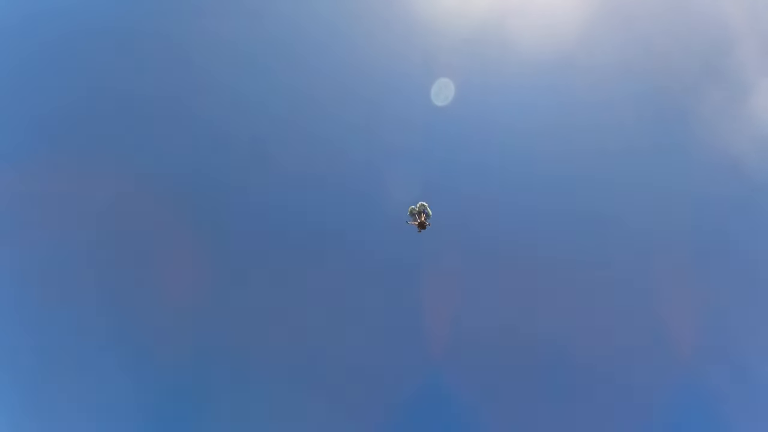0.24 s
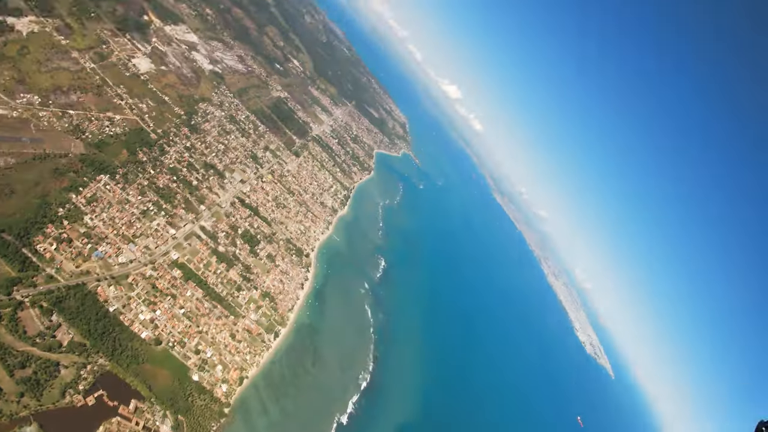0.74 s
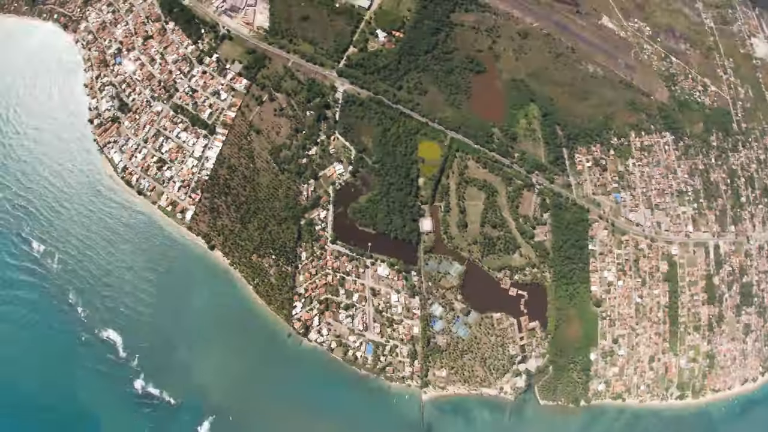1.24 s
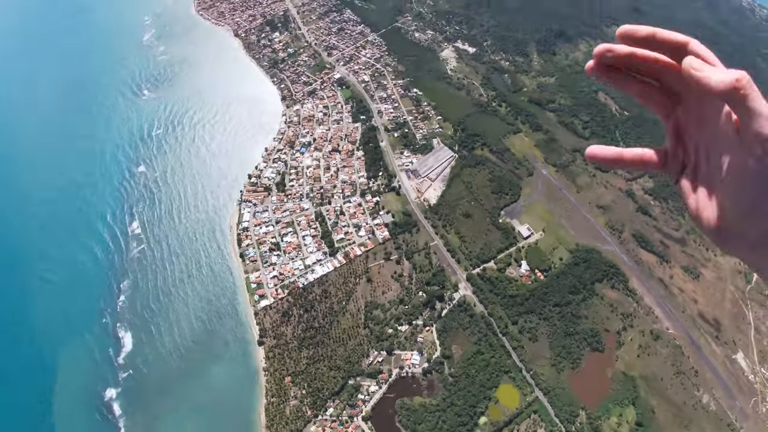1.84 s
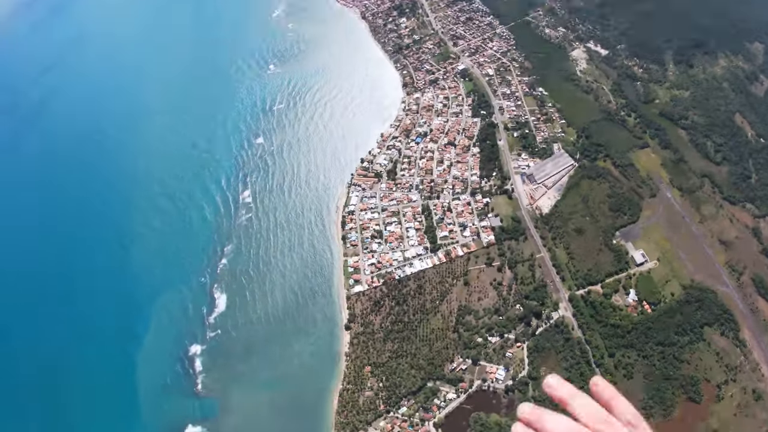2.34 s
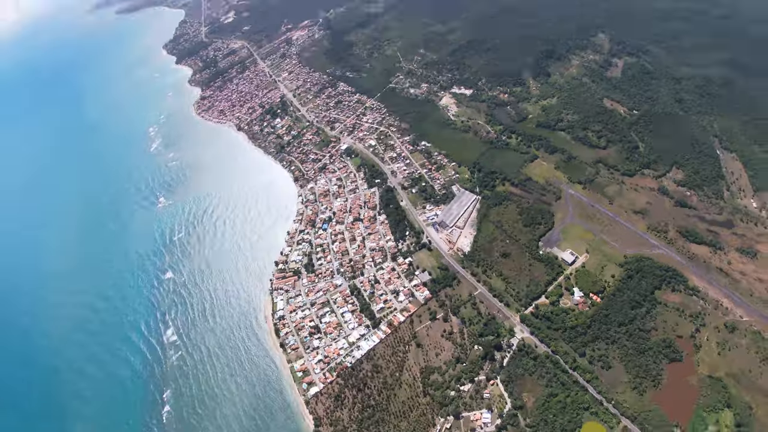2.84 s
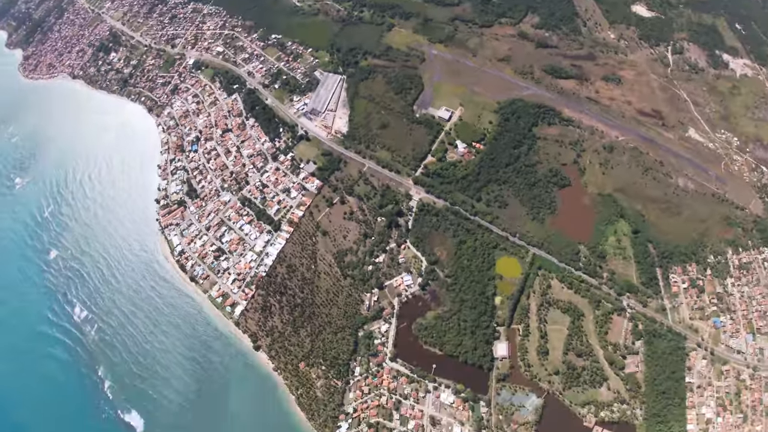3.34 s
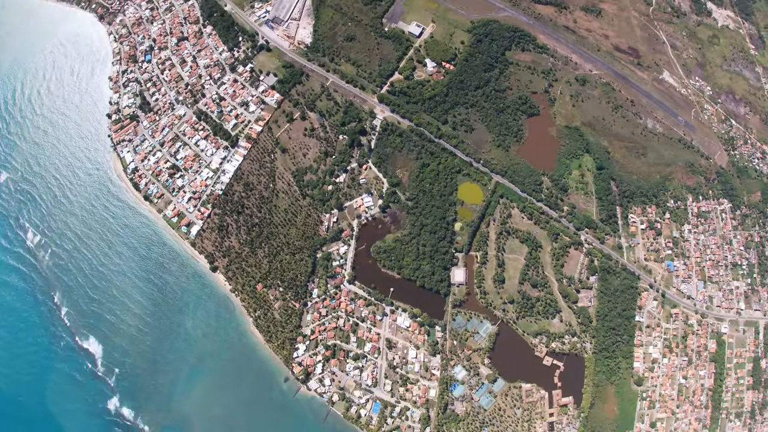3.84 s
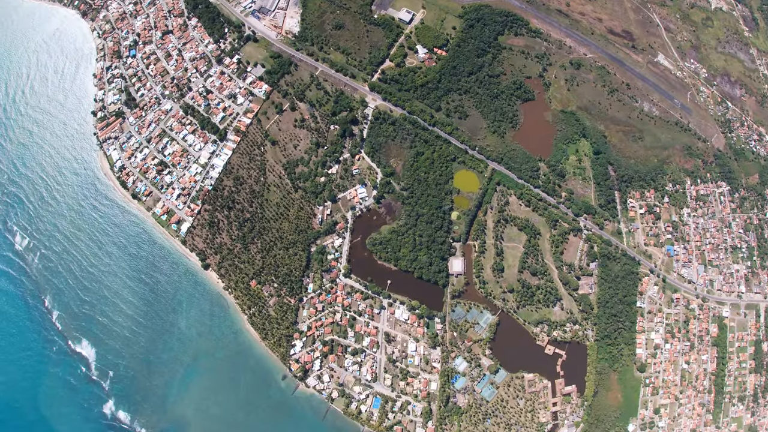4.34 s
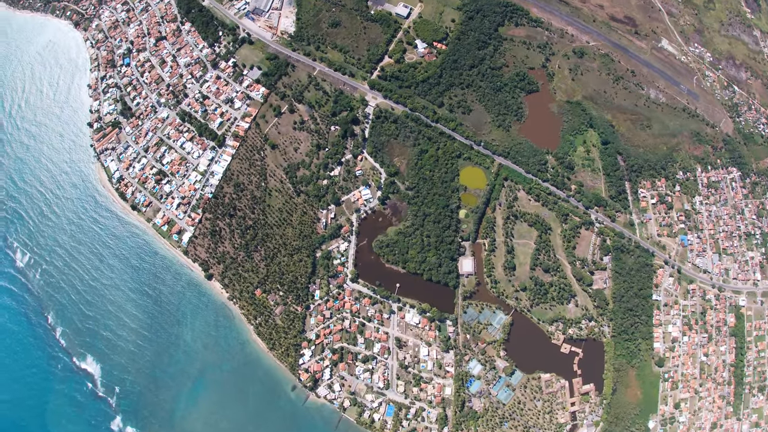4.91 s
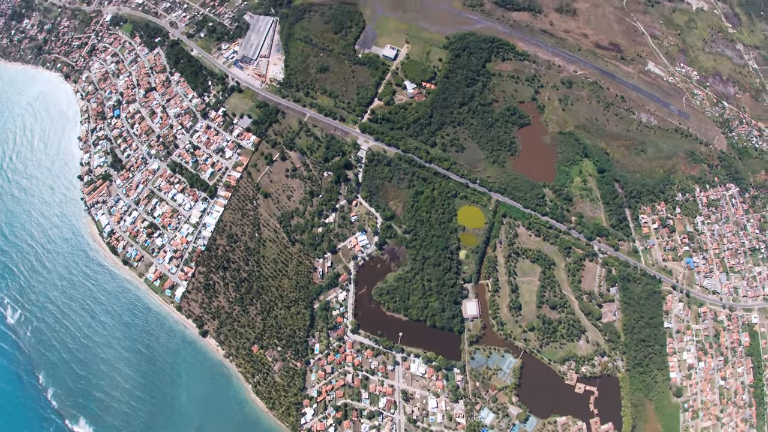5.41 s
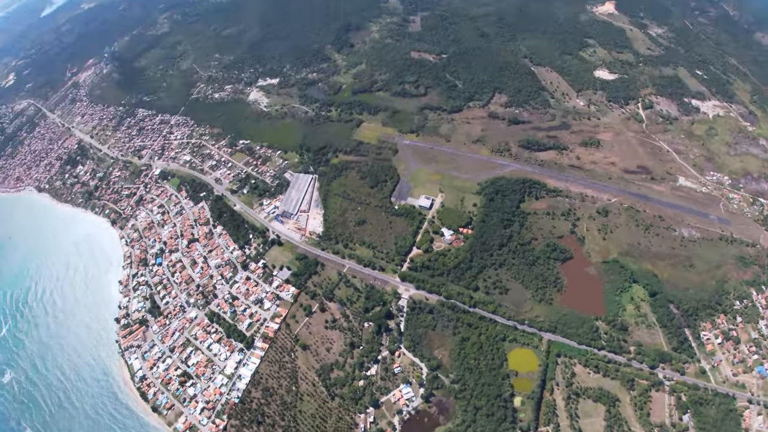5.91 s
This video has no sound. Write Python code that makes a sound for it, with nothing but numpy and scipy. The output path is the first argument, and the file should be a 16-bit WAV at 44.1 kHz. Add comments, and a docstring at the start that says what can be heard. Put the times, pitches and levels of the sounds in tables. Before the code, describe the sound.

High in open air, a skydiver's worn microphone is battered by wind. A rough, roaring rumble opens with crackling slaps and bright rushes, then drops to a weaker, fluttering throb with tiny whistles and puffs. It builds again to violent booms and slaps near three seconds, falls back suddenly, then swells into a steady, loud low roar with thickening hiss.

```python
"""Freefall wind on a worn camera

Air tears past a small camera worn by a skydiver who rolls over and settles belly down.
Rumble, vortex throb and resonant thuds buffet the microphone port under a torn, roaring wake.
Air skimming the housing is coloured noise that rushes, hisses and spits; edges add puffs and whistles.
Sharp slaps burst on the port. A limiter holds the peaks and a steep filter cuts the top."""
import sys
import numpy as np
from scipy import signal
from scipy.fft import rfft, irfft
from scipy.io import wavfile
from scipy.ndimage import uniform_filter1d, minimum_filter1d

SR = 44100
rng = np.random.default_rng(int(sys.argv[2]) if len(sys.argv) > 2 else 0)


def persist_wave(psi):
    """Save psi, clipped to +-1, as 16-bit WAV."""
    counts = np.round(np.clip(psi, -1, 1) * 32767).astype(np.int16)
    wavfile.write(sys.argv[1], SR, np.atleast_2d(counts).T)


N = 272097
TIME = np.arange(N) / SR

# Movement of the body and its flow
# how strongly air skims along the housing: (time [s], reference level [dB])
SKIM_LEVEL = [(0, -37.5), (0.188, -36.5), (0.205, -29), (0.255, -32), (0.277, -23.5), (0.38, -26),
              (0.45, -30), (0.58, -32), (0.63, -41), (0.73, -40), (0.81, -43), (0.87, -44), (1.2, -42.5),
              (1.29, -38.5), (1.38, -34), (1.595, -31.5), (1.635, -39.5), (1.77, -37), (1.92, -31.5),
              (2.3, -31.5), (2.37, -36), (2.5, -36), (2.66, -23), (2.74, -32.5), (2.96, -38.5), (2.99, -42),
              (3.35, -47), (3.47, -43), (3.65, -43.5), (3.72, -38), (3.79, -36.5), (3.86, -33), (4.0, -32),
              (4.9, -29.5), (5.35, -25.5), (5.82, -25), (5.885, -30), (6.17, -30)]
# how far the flow has torn off the housing: (time [s], share [0-1])
TORN_SHARE = [(0, 0.32), (.17, 0.63), (.32, 0.66), (.56, 0.58), (.73, 0.13), (.87, 0.43), (.93, 0.3),
              (1.15, 0.62), (1.26, 0.35), (1.295, 0.26), (1.75, 0.21), (2.15, 0.49), (2.4, 0.2),
              (2.72, 0.84), (2.98, 0.55), (2.995, 0.6), (3.25, 0.11), (3.85, 0), (5.7, 0.08), (6.17, 0.38)]
# how hard air beats on the port as the body rolls over and settles: (time [s], reference level [dB])
PORT_FORCE = [(0, -16.5), (0.2, -16), (0.48, -13.5), (.615, -14.5), (0.64, -17.5), (0.74, -13.5),
              (0.82, -16.5), (0.87, -19), (0.89, -20), (1.15, -21.5), (1.33, -22.5), (1.48, -18),
              (1.8, -18), (2.1, -15.5), (2.38, -16), (2.6, -14.5), (2.75, -15), (2.88, -15), (2.985, -15),
              (2.997, -23), (3.035, -20.5), (3.15, -20), (3.25, -20), (3.4, -21.5), (3.5, -19.5),
              (3.7, -19), (3.85, -16.5), (4.3, -14.5), (6.17, -15.0)]
# how fast the body sheds vortices as it turns: (time [s], rate [Hz])
SHEDDING_RATE = [(0, 129), (.5, 165), (.85, 130), (.96, 85), (1.2, 195), (1.45, 128), (1.85, 122),
                 (2.15, 167), (2.45, 105), (2.85, 138), (2.98, 145), (3.05, 112), (3.25, 108), (3.7, 118),
                 (4.0, 150), (4.35, 185), (4.8, 178), (5.02, 105), (5.25, 130), (6.17, 117.5)]
# centre of the hard upper roar, which sinks as each turn dies away: (time [s], frequency [Hz])
TEAR_CENTRE = [(0, 360), (.56, 385), (.66, 290), (.87, 210), (1.1, 290), (2.15, 345), (2.7, 430),
               (2.98, 290), (6.17, 380)]

# Noise colours, of which only the shape counts
# low rumble of large eddies: (frequency [Hz], relative level [dB])
BUFFET_COLOUR = [(16, -12.5), (30, -10), (45, -5), (65, -1), (100, 2.5), (130, -4), (160, -5.5),
                 (200, -3.5), (270, -13), (400, -25.5), (800, -44)]
# roar of the wake: (frequency [Hz], relative level [dB])
WAKE_COLOUR = [(140, -12), (220, 1), (290, -1), (400, -6.5), (520, -12), (700, -16), (1100, -22),
               (2200, -45), (5000, -71)]
# rush of skimming air: (frequency [Hz], relative level [dB])
RUSH_COLOUR = [(300, -19.5), (600, 2), (850, 2.5), (1300, 1.5), (1900, -1), (2400, -5), (3000, -7),
               (4200, -18.5), (5500, -30.5), (8000, -42.5)]
# fine hiss of skimming air: (frequency [Hz], relative level [dB])
HISS_COLOUR = [(2000, -10.5), (3500, 4.5), (4500, 1), (5500, -3.5), (6300, -7.5), (7100, -9.5), (8000, -17),
               (10000, -26.5), (12500, -35.5), (14000, -50)]

# Single events
# eddies that slap the port: (onset [s], envelope peak [dB])
SLAP_EVENTS = [(0.029, -28.5), (0.041, -30), (0.064, -25.5), (0.094, -25.5), (0.1, -24), (0.134, -25),
               (0.16, -25), (0.197, -25), (.681, -27.5), (0.701, -31), (.719, -29), (.735, -33),
               (.759, -30), (2.484, -27.5), (2.727, -28), (2.776, -34), (2.792, -27), (2.807, -26),
               (2.855, -26.5), (2.871, -31), (2.92, -33), (2.953, -30.5)]
# air catching an edge, a whistle if narrow, a puff if wide:
# (centre time [s], length [s], frequency [Hz], glide [octaves/s], width [Hz], level [dB])
WHISTLE_SWELLS = [(.1, .1, 2900, 0.5, 1100, -41.5), (.235, 0.029, 1710, 2, 900, -25),
                  (.283, .018, 2500, -0.5, 2800, -27), (.365, 0.05, 2000, -1.5, 2400, -26),
                  (.515, 0.063, 1194, 0.5, 1770, -26.5), (.572, 0.029, 1153, -1.5, 1300, -26),
                  (.72, 0.026, 2120, 0, 130, -38), (.728, 0.047, 3000, 0, 2000, -38.5),
                  (.79, .05, 850, -2, 700, -34), (.863, 0.021, 1820, 1.5, 900, -35),
                  (.868, 0.012, 570, 0, 200, -25), (.94, 0.047, 800, -0.5, 700, -35),
                  (.985, 0.048, 3300, -4, 1700, -47), (1.02, .012, 1500, 1, 900, -28),
                  (1.045, 0.025, 1516, -3, 800, -30.5), (1.095, 0.041, 980, -2.5, 380, -31),
                  (1.1, .03, 620, -1.5, 130, -31), (1.16, 0.02, 1050, -3.5, 90, -43),
                  (1.165, 0.025, 724, -2, 90, -32.5), (1.235, 0.05, 560, -1, 90, -29.5),
                  (1.19, 0.036, 470, -0.5, 130, -30), (1.255, 0.021, 467, -1.5, 50, -28),
                  (2.605, 0.04, 1497, 0.5, 2400, -31), (3.7, 0.034, 1807, -0.5, 3400, -34.5),
                  (5.55, .25, 1500, 0, 1100, -31)]
# the biggest eddies shoving the port, a thud if wide, a hollow boom if narrow:
# (centre time [s], length [s], frequency [Hz], glide [octaves/s], width [Hz], level [dB])
THUD_SWELLS = [(.33, 0.08, 35.7, -3, 45, -15), (.44, .04, 120, -0.5, 40, -13),
               (.61, 0.027, 260, -5.5, 68, -16), (.69, 0.034, 239, 0, 38, -18),
               (.735, 0.036, 370, -0.5, 55, -21), (.81, 0.065, 128, -0.5, 15, -12),
               (.79, .04, 300, -1.5, 260, -22.5), (.855, 0.043, 229, -2.5, 30, -18.5),
               (.935, .04, 78, -8, 19, -16.5), (1.005, .025, 92, -0.5, 22, -19.5),
               (1.3, 0.044, 250, -0.5, 40, -22.5), (1.5, 0.26, 40.2, 1.5, 45, -23),
               (2.43, 0.036, 95, -0.5, 22, -14), (2.52, 0.03, 168.3, -3.5, 30, -12),
               (2.66, 0.036, 80.5, 4, 30, -14.5), (2.715, .04, 400.4, -2.5, 35, -16.5),
               (2.74, 0.05, 125, 0, 29, -11), (2.812, 0.022, 250.5, -1, 48, -8.5),
               (2.865, 0.07, 35, 2.5, 28, -14.5), (2.862, 0.014, 380, 0, 49, -13.5),
               (2.92, 0.019, 193.3, -6, 34, -8), (2.958, 0.019, 135, -0.5, 24, -11.5),
               (2.976, 0.014, 261, 4.5, 40, -12), (3.06, 0.026, 138, -3.5, 20, -21.5),
               (3.47, 0.031, 115, -0.5, 42, -12.5), (4.07, 0.037, 140, 1.5, 67, -24),
               (4.33, 0.021, 215.4, 2.5, 67, -17), (4.43, 0.029, 160, 0.5, 32, -16.5),
               (4.77, 0.031, 208.7, 2.5, 84, -21), (5.06, 0.056, 68.4, -1.5, 23, -16.5),
               (6.06, 0.037, 125, 4, 65, -14)]
# clean tones where air locks on to a slot: (start [s], length [s], frequency [Hz], glide [octaves/s], level [dB])
SLOT_TONES = [(0.67, 0.05, 1250, 1.9, -37), (1.083, 0.087, 1860, .1, -43)]

# Port: rumble re the force; throb re the rumble, and its gain in fully torn flow
BUFFET_DB, THROB_DB, THROB_TORN_DB = 0.5, -2, 4.5
WAKE_DB, WAKE_AT_HZ = -7.5, 146.5  # wake re the force, at this shedding rate in clinging flow
WAKE_DB_PER_OCTAVE, WAKE_TORN_DB = 4.5, 8.5  # growth with faster shedding, and in fully torn flow
TEAR_WIDTH_HZ, TEAR_DB = 315, -3  # hard upper roar of fully torn flow, re the force
ROAR_HOLD_S = 0.035  # span over which both roars even out

# Skimming air: levels re the skimming level, and their gain in fully torn flow
RUSH_DB, RUSH_TORN_DB = 3, -2.5
HISS_DB, HISS_TORN_DB = -9.5, -10.5
RUSH_CRACKLE, HISS_CRACKLE = 0.94, 0.9  # depth of the spits in fully torn flow
RIDE_DB = 2  # gain swing in fully torn flow, per unit of evened port pressure
EDGE_HZ, EDGE_WIDTH_HZ, EDGE_DB = 2500, 1700, -7.5  # bright edge rush in clinging flow
EDGE_FROM_DB, EDGE_GROWTH = -28.5, 0.72  # skimming level where that holds; extra dB per dB above

# Gusts: rate; spread at the port; spread of fully torn skimming air
GUST_PER_S, GUST_DB, SKIM_GUST_DB = 14, 0.4, 1
SPIT_MOST = 2.6  # strongest spit, in spreads above the weakest

# Slaps: pop and hiss re the rush in the spray, sputter re the burst
SLAP_DECAY_S, SLAP_TOP_HZ = 0.0017, 6000
SLAP_POP_HZ, SLAP_POP_DB, SLAP_HISS_DB = 623, 4.5, -16
SLAP_TAIL_S, SLAP_TAIL_DB = 0.014, -10.5

# Slot tones: rise and fall; pitch spread as a share; depth of level flutter
TONE_FADE_S, TONE_WAVER, TONE_FLUTTER = 0.012, 0.0048, 0.45

CEILING_DB, TOP_HZ = -1.3, 13200  # limiter ceiling and top cut


def undb(db):
    """Decibels to gain."""
    return 10 ** (np.asarray(db) / 20)


def unit(x):
    """Scale to rms 1."""
    return x / np.sqrt(np.mean(x ** 2))


def curve(table):
    """Second column of a table, joined by straight lines in time."""
    times, values = np.transpose(table)
    return np.interp(TIME, times, values)


def colour(x, points):
    """Filter by a spectrum drawn in straight lines over log frequency."""
    hz, db = np.transpose(points)
    bins = np.maximum(np.fft.rfftfreq(N, 1 / SR), 1)
    gain = undb(np.interp(np.log(bins), np.log(hz), db, left=-100, right=-100))
    return irfft(rfft(x) * gain, N)


def steady(x, span_s):
    """Hold the mean power near 1 over a short span, leaving the faster flutter."""
    window = signal.windows.hann(int(span_s * SR) + 3)
    weight = signal.fftconvolve(np.ones(len(x)), window, "same")
    power = signal.fftconvolve(x ** 2, window, "same") / weight
    return x / np.sqrt(power)


def band_noise(hz, width_hz):
    """Noise in one bell-shaped band, rms 1."""
    bell = np.exp(-2 * ((np.fft.rfftfreq(N, 1 / SR) - hz) / width_hz) ** 2)
    return unit(irfft(rfft(rng.standard_normal(N)) * bell, N))


def moving_band(hz, width_hz):
    """Noise in one bell-shaped band whose centre follows hz, rms 1."""
    bell = np.exp(-2 * (np.fft.fftfreq(len(hz), 1 / SR) / width_hz) ** 2)
    real, imaginary = rng.standard_normal((2, len(hz)))
    drift = np.fft.ifft((real + 1j * imaginary) * bell)
    carrier = np.exp(2j * np.pi * np.cumsum(hz) / SR)
    return unit(np.real(drift * carrier))


def turbulence(points, span_s):
    """Random pressure of a given colour and steady strength."""
    return steady(colour(rng.standard_normal(N), points), span_s)


def gusts(spread_db):
    """Gain of small gusts that come and go at random."""
    knots = np.arange(0, N / SR * GUST_PER_S + 1)
    drift = np.interp(TIME * GUST_PER_S, knots, rng.standard_normal(len(knots)))
    return undb(spread_db * drift)


def spits(per_s, spread_db, length_s):
    """Tiny eddies bursting at random: short swells, most weak and a few strong; rms near 1."""
    hit = rng.random(N) < per_s / SR
    size = undb(spread_db * np.minimum(rng.exponential(size=N), SPIT_MOST))
    shape = signal.windows.hann(int(length_s * SR) + 3)
    train = signal.fftconvolve(hit * size, shape, "same")
    return steady(unit(train) + 0.05, span_s=0.69)


def resonant_swells(table, hold_s):
    """Bands of noise that swell, glide and fade, as short resonances in the flow."""
    out = np.zeros(N + SR)  # half a second of margin at each end
    age = np.arange(SR) / SR - 0.5
    for centre, length, hz, glide, width, db in table:
        pitch = hz * 2 ** (glide * np.clip(age, -2 * length, 2 * length))
        envelope = undb(db) * np.exp(-2 * (age / length) ** 2)
        start = int(centre * SR)
        out[start:start + SR] += envelope * steady(moving_band(pitch, width), hold_s)
    return out[SR // 2:SR // 2 + N]


def skimming_air(pressure, skim_db, torn):
    """Fine turbulence rides the port pressure; torn flow loses hiss and edge rush and breaks into spits."""
    ride = undb(RIDE_DB * torn * steady(pressure, span_s=0.22))
    crackle = torn ** 2 * spits(per_s=680, spread_db=12.5, length_s=0.0015)

    rush = turbulence(RUSH_COLOUR, span_s=0.6) * ride * (1 + RUSH_CRACKLE * crackle)
    rush = steady(rush, span_s=0.47) * undb(RUSH_DB + RUSH_TORN_DB * torn)

    hiss = turbulence(HISS_COLOUR, span_s=0.11) * ride * (1 + HISS_CRACKLE * crackle)
    hiss = steady(hiss, span_s=0.19) * undb(HISS_DB + HISS_TORN_DB * torn)

    edge_db = EDGE_DB + EDGE_GROWTH * (skim_db - EDGE_FROM_DB)
    edge = band_noise(EDGE_HZ, EDGE_WIDTH_HZ) * ride * (1 - torn) * undb(edge_db)
    return (rush + hiss + edge) * undb(skim_db) * gusts(SKIM_GUST_DB * torn)


def edge_whistles():
    """Air catching an edge of the housing rings in narrow whistles or wide puffs."""
    return resonant_swells(WHISTLE_SWELLS, hold_s=0.06)


def slot_tones():
    """Air locked on to a slot: nearly pure tones that catch, waver and flutter, and let go."""
    out = np.zeros(N)
    waver = 1 + TONE_WAVER * band_noise(0, width_hz=75)
    for start, length, hz, glide, db in SLOT_TONES:
        age = np.clip(TIME - start, 0, length)
        held = np.clip(np.minimum(age, length - age) / TONE_FADE_S, 0, 1)
        pitch = hz * 2 ** (glide * age) * waver
        tone = np.sqrt(2) * np.sin(2 * np.pi * np.cumsum(pitch) / SR)
        out += undb(db) * held * tone
    return out * (1 + TONE_FLUTTER * band_noise(0, width_hz=70))


def slaps():
    """Eddies bursting right on the port: a dull pop and a spit of rush, then a ragged sputter."""
    burst, tail = np.zeros(N), np.zeros(N)
    for onset, db in SLAP_EVENTS:
        age = np.clip(TIME - onset, 0, 0.5)
        decays = age / SLAP_DECAY_S
        burst += undb(db) * decays * np.exp(1 - decays)
        tail += undb(db) * (1 - np.exp(-decays)) * np.exp(-age / SLAP_TAIL_S)
    sputter = tail * spits(per_s=300, spread_db=7.5, length_s=0.0011)
    envelope = burst + undb(SLAP_TAIL_DB) * sputter

    spray = turbulence(RUSH_COLOUR, span_s=0.0044)
    spray += undb(SLAP_HISS_DB) * turbulence(HISS_COLOUR, span_s=0.006)
    pop = steady(band_noise(SLAP_POP_HZ, width_hz=420), span_s=0.0066)
    soften = signal.butter(3, SLAP_TOP_HZ, fs=SR, output="sos")
    return signal.sosfilt(soften, envelope * (spray + undb(SLAP_POP_DB) * pop))


def thuds():
    """The biggest eddies shove the port in low, gliding thuds and hollow booms."""
    return resonant_swells(THUD_SWELLS, hold_s=0.04)


def vortex_throb(shedding_hz):
    """Shed vortices come only roughly in step, so their throb is a wide, wandering hump."""
    turn = 2 * np.pi * np.cumsum(shedding_hz) / SR
    in_phase = band_noise(0, width_hz=62) * np.cos(turn)
    quadrature = band_noise(0, width_hz=88) * np.sin(turn)
    return steady(in_phase + quadrature, span_s=0.059)


def port_pressure(force_db, torn):
    """Eddies rumble and vortices throb on the port; the wake roars above and hardens as it tears."""
    shedding_hz = curve(SHEDDING_RATE)
    rumble = turbulence(BUFFET_COLOUR, span_s=1.0)
    throb = undb(THROB_DB + THROB_TORN_DB * torn) * vortex_throb(shedding_hz)
    buffet = steady(rumble + throb, span_s=0.061) * undb(BUFFET_DB)

    wake_db = WAKE_DB + WAKE_DB_PER_OCTAVE * np.log2(shedding_hz / WAKE_AT_HZ) + WAKE_TORN_DB * torn
    wake = turbulence(WAKE_COLOUR, ROAR_HOLD_S) * undb(wake_db)

    tear = steady(moving_band(curve(TEAR_CENTRE), TEAR_WIDTH_HZ), ROAR_HOLD_S)
    tear = tear * undb(TEAR_DB) * torn
    return (buffet + wake + tear) * undb(force_db) * gusts(GUST_DB)


def scene():
    """All the air at the one microphone."""
    torn = np.clip(curve(TORN_SHARE), 0, 1)
    pressure = port_pressure(curve(PORT_FORCE), torn) + thuds()
    air = skimming_air(pressure, curve(SKIM_LEVEL), torn)
    mix = air + edge_whistles() + slot_tones() + slaps() + pressure
    return mix[None]


def limiter(x, ceiling_db, hold_s):
    """Look ahead and turn the gain down smoothly around every peak above the ceiling."""
    size = int(hold_s * SR) + 1
    room = np.minimum(1, undb(ceiling_db) / (np.abs(x) + 1e-9))
    return x * uniform_filter1d(minimum_filter1d(room, size), size)


def record(dry):
    """The camera limits the peaks, then cuts the top with a steep low-pass."""
    held = limiter(dry[0], CEILING_DB, hold_s=0.012)
    top_cut = signal.ellip(8, 0.2, 70, TOP_HZ, fs=SR, output="sos")
    return signal.sosfilt(top_cut, held)[None]


dry = scene()
out = record(dry)
persist_wave(out)
```